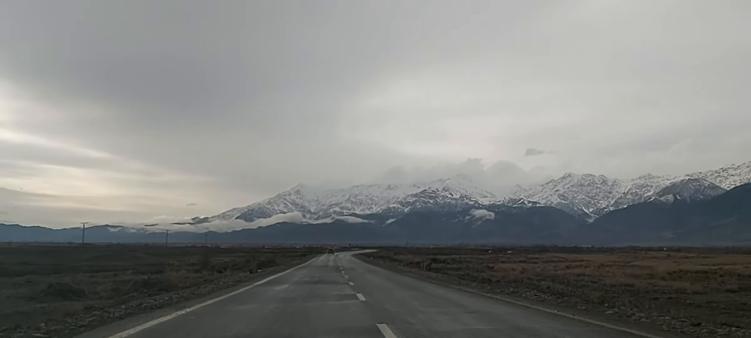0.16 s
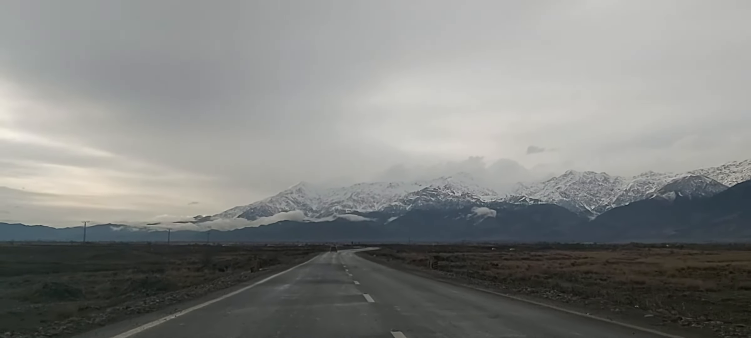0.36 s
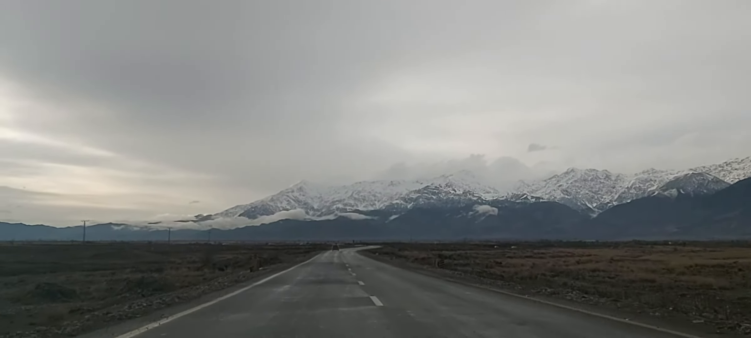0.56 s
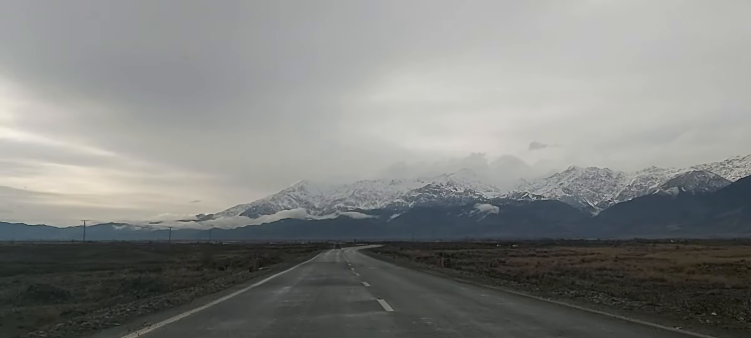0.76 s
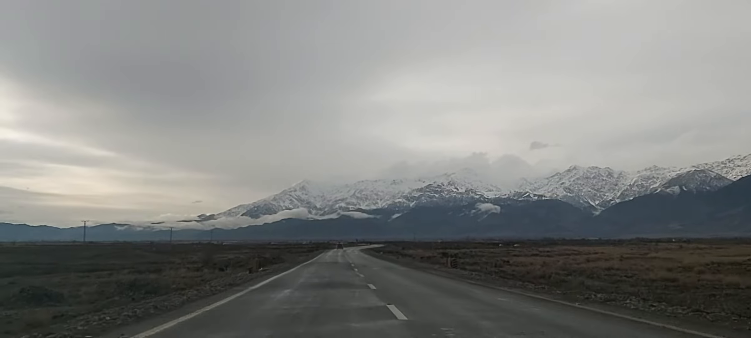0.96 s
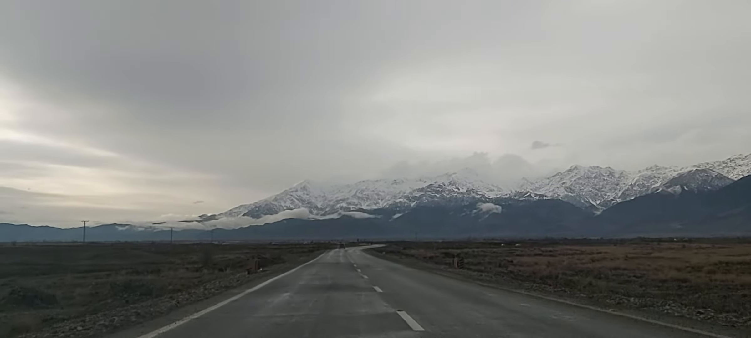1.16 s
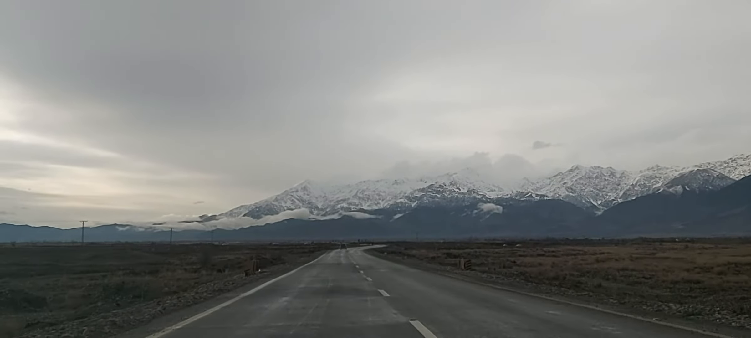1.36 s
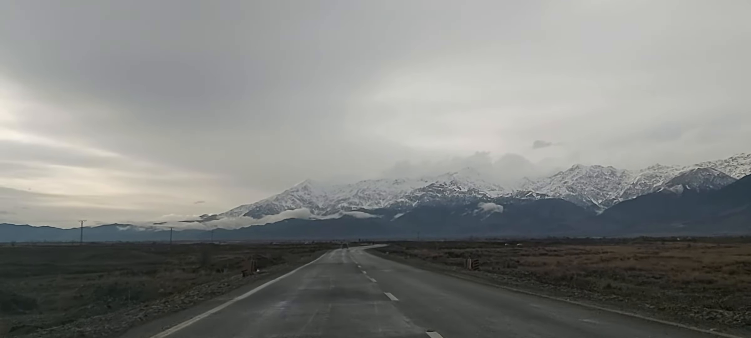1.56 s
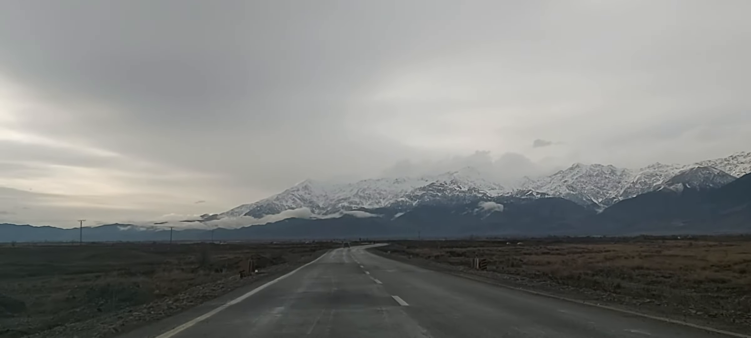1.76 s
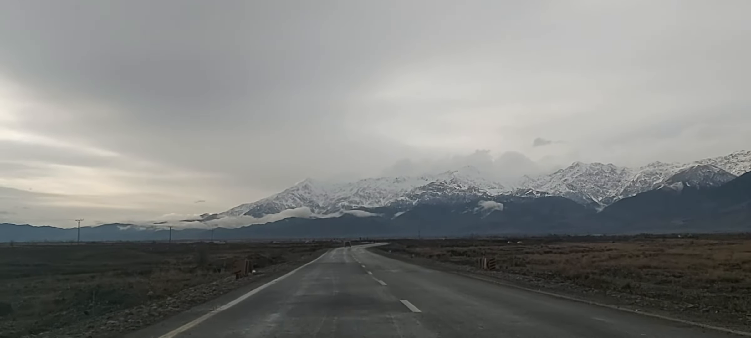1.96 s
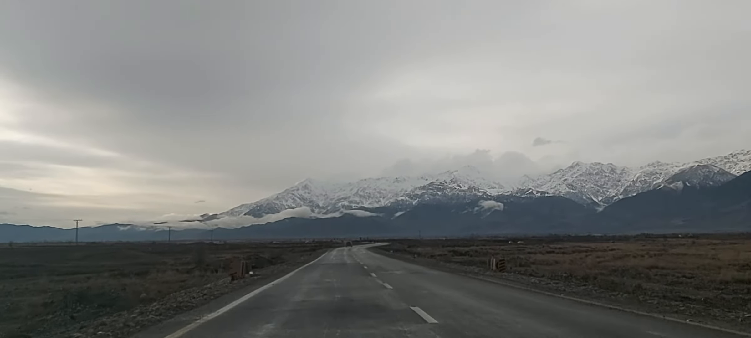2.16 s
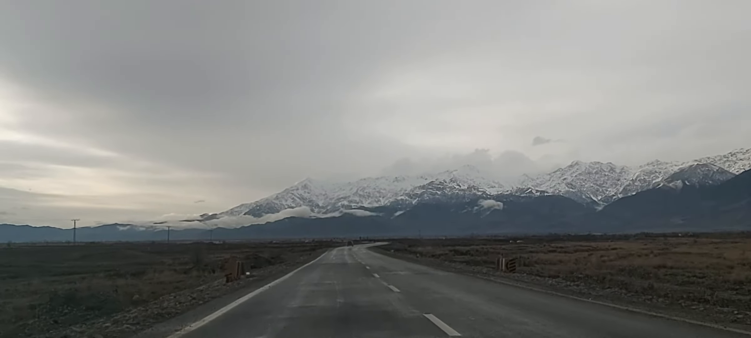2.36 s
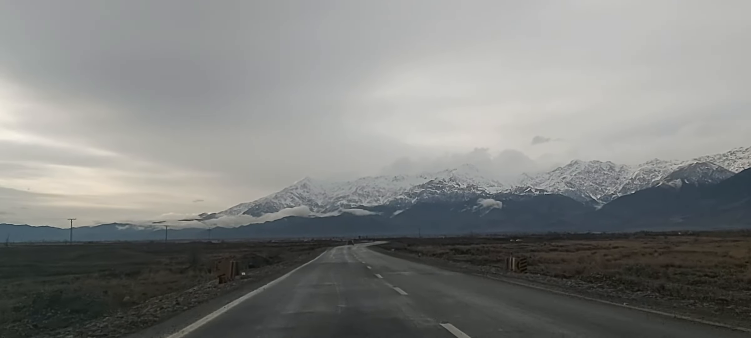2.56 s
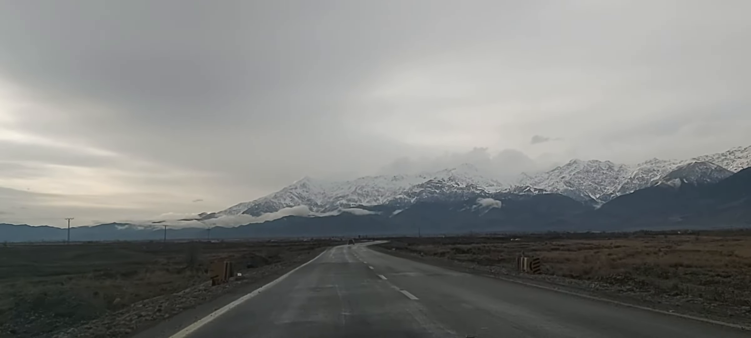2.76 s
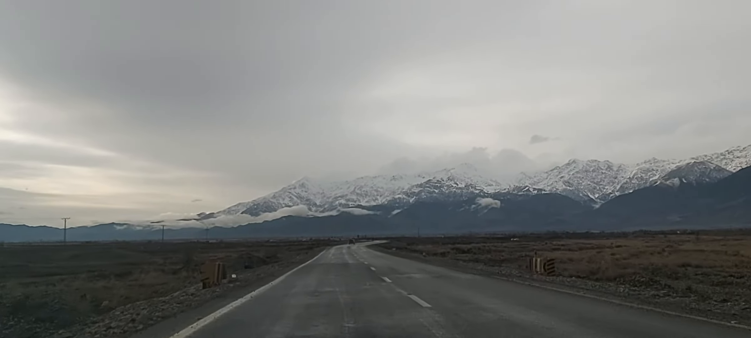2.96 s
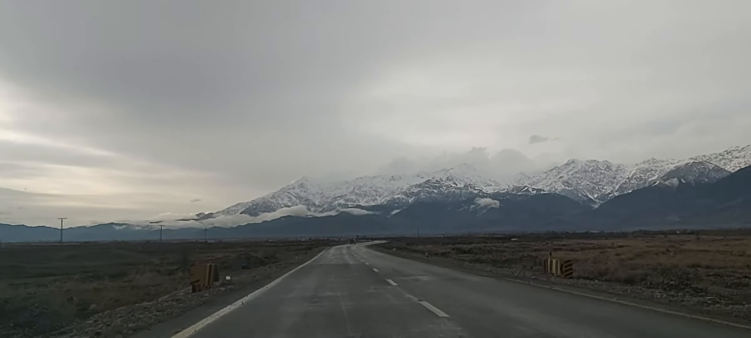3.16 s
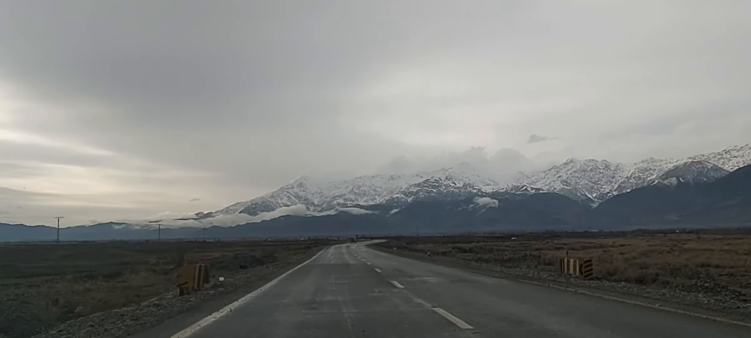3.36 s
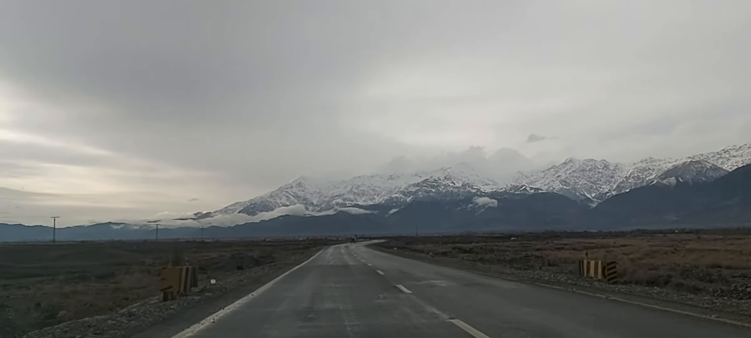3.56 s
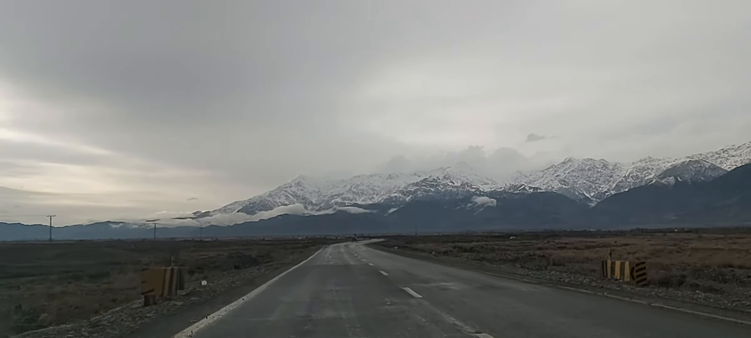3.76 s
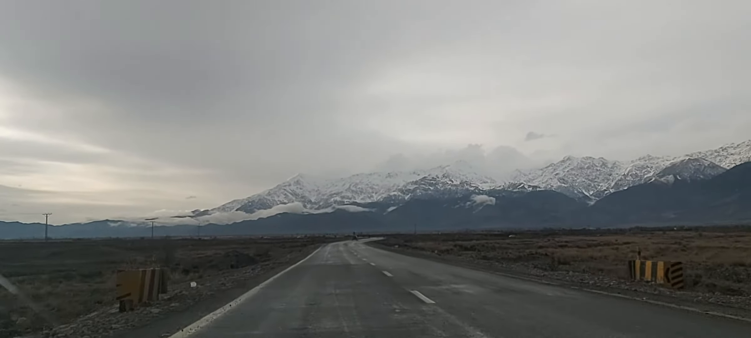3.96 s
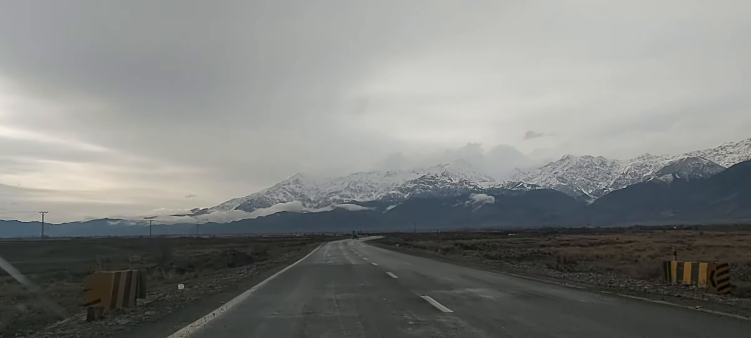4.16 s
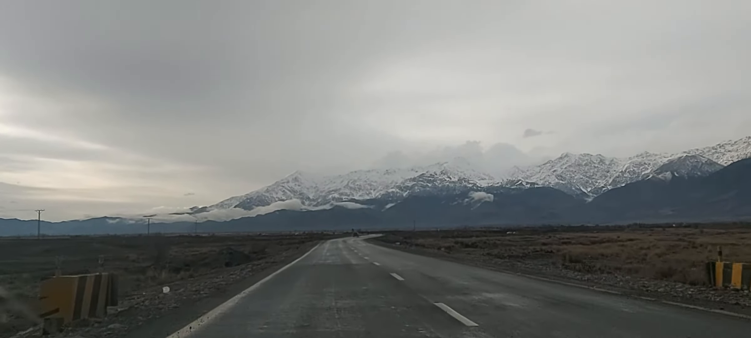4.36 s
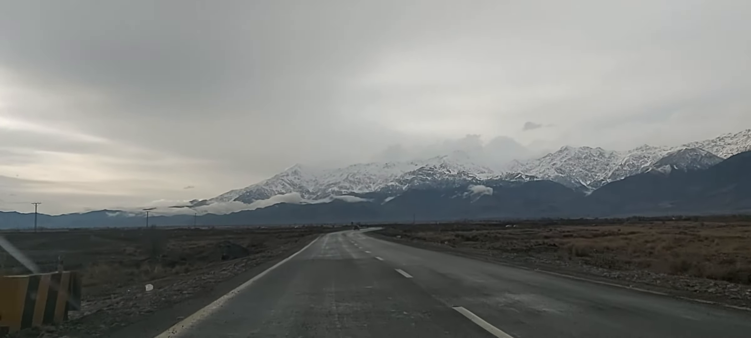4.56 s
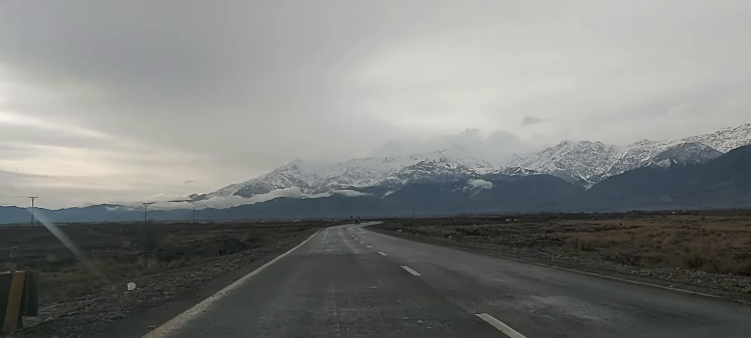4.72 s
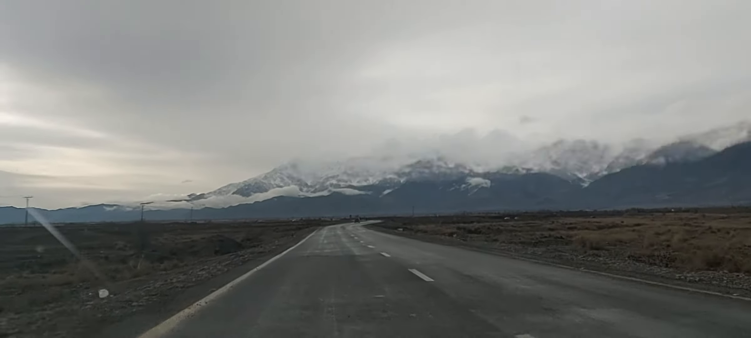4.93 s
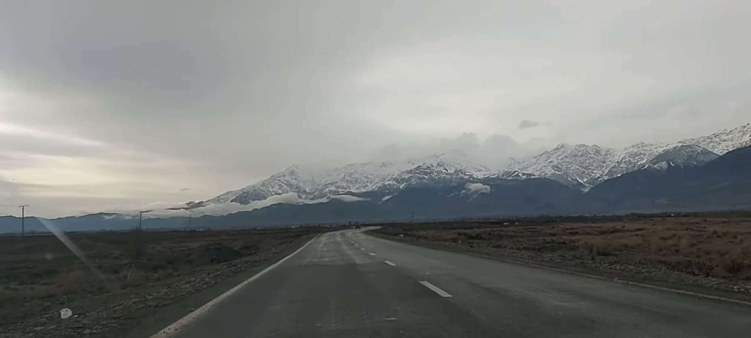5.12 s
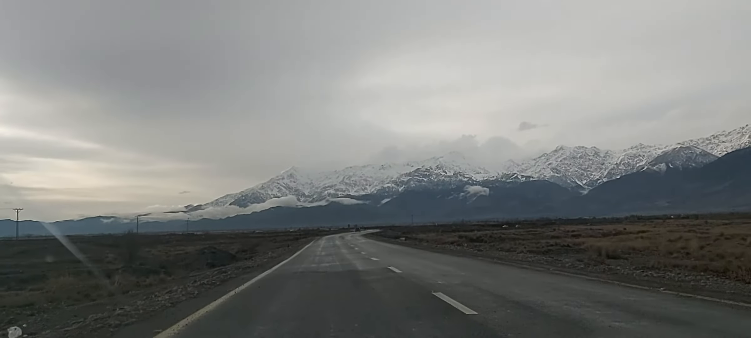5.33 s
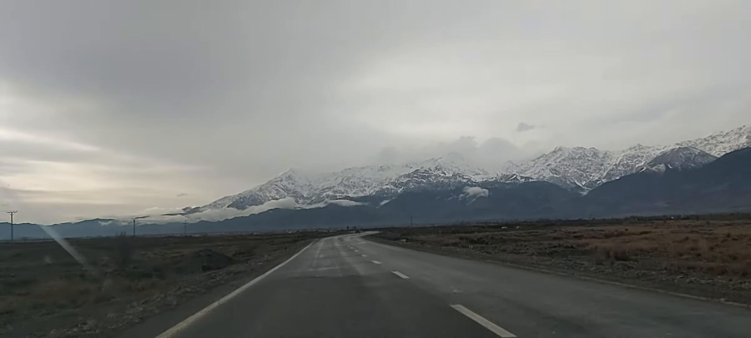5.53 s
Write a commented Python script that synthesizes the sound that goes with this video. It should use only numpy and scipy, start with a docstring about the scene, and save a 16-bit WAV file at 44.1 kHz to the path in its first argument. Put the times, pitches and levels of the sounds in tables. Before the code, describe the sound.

Car cabin on a country road: deep rumble and engine hum, tick-tock turn signal, dull bump thuds, and sharp plastic rattles near the end.

```python
"""A car engine drones low in the cabin on a country road: multiples of its firing rate, added as sines.
The indicator relay goes tick-tock: noise bursts over the damped modes of its housing.
Bumps in the road set the microphone's mount booming: damped sines. Loose plastic trim snaps early on and
near the end, where it also rattles: filtered impulses and modulated noise.
Behind lie tyre rumble, roar and hiss, all shaped noise, and the droning resonance of the cabin, a sine."""
import sys
import numpy as np
from scipy import signal
from scipy.fft import rfft, irfft, next_fast_len
from scipy.io import wavfile
from scipy.ndimage import uniform_filter1d, minimum_filter1d

SR = 44100
rng = np.random.default_rng(int(sys.argv[2]) if len(sys.argv) > 2 else 0)


def pcm_store(signal):
    """Save signal as 16-bit PCM."""
    levels = np.round(np.clip(np.atleast_2d(signal), -1, 1) * 32767)
    wavfile.write(sys.argv[1], SR, levels.astype(np.int16).T)


N = 250929
T = np.arange(N) / SR


def undb(db):
    """Level to amplitude: 20 dB is a factor of ten."""
    return 10 ** (np.asarray(db) / 20)


def unit(x):
    """Normalisation to a root-mean-square amplitude of 1."""
    return x / np.sqrt(np.mean(x ** 2))


def curves(table):
    """Linear interpolation in time of each column that follows t/s."""
    s, *columns = np.transpose(table)
    return [np.interp(T, s, c) for c in columns]


def pan(db):
    """Interaural level difference: left and right gains that differ by db, left minus right."""
    return undb(np.array([[db], [-db]]) / 2)


def along(points, size):
    """Interpolation over log frequency of an (f/Hz, value) table, on the bins of a transform."""
    hz, value = np.transpose(points)
    bins_hz = np.fft.rfftfreq(size, 1 / SR)
    return np.interp(np.log(bins_hz + 1), np.log(hz), value)


def colour(x, points):
    """Minimum-phase filtering: folding the cepstrum makes an (f/Hz, level/dB) response causal."""
    size = next_fast_len(x.shape[-1] // 2 + SR // 20) * 2
    cepstrum = irfft(np.log(undb(along(points, size))))
    cepstrum[1:size // 2] *= 2
    cepstrum[size // 2 + 1:] = 0
    response = np.exp(rfft(cepstrum))
    return irfft(rfft(x, size) * response)[..., :x.shape[-1]]


def walk(rate):
    """Smoothed random modulation: `rate` random steps a second, averaged twice, rms 1."""
    k = int(SR / rate)
    steps = np.repeat(rng.standard_normal(N // k + 1), k)
    return unit(uniform_filter1d(uniform_filter1d(steps, k), k)[:N])


def fade(t, t60):
    """Exponential decay: the level falls by 60 dB in t60 seconds."""
    return np.exp(-np.log(1000) * t / t60)


def add(out, s, sound):
    """Superposition: a stereo sound is summed in from time s."""
    i = max(int(s * SR), 0)
    out[:, i:i + sound.shape[1]] += sound[:, :max(N - i, 0)]


# engine speed, creeping up, then sinking as the throttle eases:
# (t/s, mean firing rate f/Hz, growl level in the 3rd multiple/dB)
ENGINE_SPEED = [(0, 63.32, -38), (.6, 64.07, -41), (1.3, 65.8, -37), (2.45, 66.8, -33), (2.8, 60.78, -35),
                (4.2, 60.14, -33), (5.69, 61.5, -42.5)]
# firing tone and its 2nd multiple: (level at the reference rate/dB, level gained per Hz of firing rate/dB)
ENGINE_TONES = [(-32, -1.25), (-30.5, -.25)]
ENGINE_REF_HZ = 64


def engine(waver=.0035, flutter_db=2.13):
    """Harmonic series: multiples of a wavering firing rate; the lowest swells nearing the cabin's resonance."""
    hz, growl_db = curves(ENGINE_SPEED)
    levels = [db + slope * (hz - ENGINE_REF_HZ) for db, slope in ENGINE_TONES]
    levels.append(growl_db)
    phase = 2 * np.pi * np.cumsum(hz * (1 + waver * walk(7.9))) / SR
    tones = np.zeros(N)
    for k, db in enumerate(levels, 1):
        tone = unit(np.sin(k * phase + rng.uniform(0, 2 * np.pi)))
        tones += tone * undb(db + flutter_db * walk(12))
    return tones * pan(-5.0)


# modes of the relay housing:
# (f/Hz, 60 dB decay time t/s, relative level pulling in/dB, relative level letting go/dB)
HOUSING_MODES = [(1070, 0.061, -7.5, -18.5), (1644, 0.035, 5, -5.5), (1986, 0.023, -14, -3),
                 (2374, 0.11, -8, -1.5), (2568, 0.035, 5, -0.5), (2770, 0.075, -16, 0.5),
                 (3370, .05, -3, -16), (6080, .04, -18.5, -29), (6600, 0.08, -20, -11.5)]
FIRST_LOUDER_DB = 1.5  # the first flash strikes harder


def relay(strokes, ring_db, points, level_db, modes_db, pan_db, ring_pan_db, t60):
    """Impact excitation: the armature chatters on its stop, the housing's modes ring, the cabin answers."""
    out, t = np.zeros((2, N)), np.arange(SR // 4) / SR
    rise = np.minimum(t / 0.0025, 1)
    cabin = undb(-21) * fade(t, .35)
    for k, s in enumerate(strokes):
        stroke_db = level_db + (FIRST_LOUDER_DB if k == 0 else 0)
        noise = rng.standard_normal((2, len(t)))
        chatter = unit(colour(noise, points)) * np.hypot(fade(t, t60), cabin)
        ring = np.zeros((2, len(t)))
        for (hz, mode_t60, _, _), db in zip(HOUSING_MODES, ring_db):
            ring += undb(db) * fade(t, mode_t60) * np.sin(2 * np.pi * (hz * t + rng.random((2, 1))))
        stroke = chatter * pan(pan_db) + undb(modes_db) * ring * pan(ring_pan_db)
        add(out, s, undb(stroke_db) * rise * stroke)
    return out


# spectrum of the chatter as the relay pulls in: (f/Hz, relative level/dB)
TICK_COLOUR = [(700, -17), (1500, -3.5), (2500, -4), (3300, -2.5), (4800, -18), (6100, -13.5), (7200, -13),
               (8600, -26.5), (12000, -22.5), (15500, -34), (16300, -51.5)]
# spectrum of the chatter as it lets go: (f/Hz, relative level/dB)
TOCK_COLOUR = [(700, -30), (1500, -3.5), (2500, 1), (3600, -6), (4500, -18), (6700, -12), (8300, -22.5),
               (9600, -11.5), (11000, -17), (12500, -13), (15600, -20.5), (16300, -43.5)]
# the flasher's clock: first tick, period, time the lamp stays lit, how much sooner the second tick comes
FIRST_TICK_S, FLASH_S, LIT_S, FIRST_SHORT_S = .263, .685, .3428, .0232


def indicator():
    """Periodic switching: each flash has a full tick as the relay pulls in, a thinner tock as it lets go."""
    _, _, pull_db, release_db = np.transpose(HOUSING_MODES)
    pulls = np.arange(FIRST_TICK_S, N / SR, FLASH_S)
    pulls[1:] -= FIRST_SHORT_S
    tick = relay(pulls, pull_db, TICK_COLOUR, level_db=-40.5, modes_db=0,
                 pan_db=-10.0, ring_pan_db=-17.0, t60=0.08)
    tock = relay(pulls + LIT_S, release_db, TOCK_COLOUR, level_db=-41, modes_db=-4.5,
                 pan_db=-9.5, ring_pan_db=-9, t60=0.076)
    return tick + tock


# jolts from the road: (t/s, relative level/dB)
BUMPS = [(.425, -11), (0.827, -0.5), (.879, -4.5), (.908, -9.5), (2.878, -5), (4.162, -5), (4.959, -11.5),
         (5.324, -5.5), (5.367, -11.5), (5.396, -2), (5.544, -0.5), (5.628, -8.5)]
BUMP_PUSH_S = .013  # time for the mount to swing up


def bumps(ring_hz=138, t60=0.11, thud_db=-10.0, thud_hz=95):
    """Damped oscillation: each jolt swings the mount up, then it rings out over a lower thud of the body."""
    out, t = np.zeros((2, N)), np.arange(SR // 4) / SR
    push = np.sin(np.pi / 2 * np.minimum(t / BUMP_PUSH_S, 1)) ** 2
    swing = push * fade(np.maximum(t - BUMP_PUSH_S, 0), t60)
    ring = np.sin(2 * np.pi * ring_hz * t)
    for s, db in BUMPS:
        thud = undb(thud_db) * np.sin(2 * np.pi * (thud_hz * t + rng.random()))
        add(out, s, undb(db) * swing * (ring + thud) * pan(-3.0))
    return out


# trim snaps: (t/s, relative level/dB, left minus right level/dB, dull above f/Hz)
SNAPS = [(0.483, -28, -15, 3500), (0.681, -31.5, 15, 5000), (.810, -14, -19, 1600), (4.8127, 0.5, 19, 4700),
         (4.915, -6.5, -27, 17000), (4.918, -2, -9, 5500), (4.9755, -21.5, 8, 7000),
         (5.1132, -6, -13, 3600), (5.168, -21, 0, 5000), (5.2064, 0.5, -13, 1470),
         (5.539, -13.5, -21, 2800), (5.596, -22.5, -11.5, 3000)]
# spectrum of a snap before dulling: (f/Hz, relative level/dB)
TRIM_COLOUR = [(200, -13), (600, 0.5), (1250, 2.5), (2300, 1), (3300, -4), (4250, 2), (5800, -7),
               (8000, -1.5), (13000, 4.5), (16000, 1.5)]
SNAP_CYCLES = 42  # 60 dB decay in cycles of the dulling frequency: soft contacts last longer


def trim(level_db=-3, scatter_db=-19, tail_db=-54):
    """Impulse response: loose plastic snaps once, scatters off nearby panels and dies in the upholstery."""
    out, t = np.zeros((2, N)), np.arange(SR // 6) / SR
    for s, db, pan_db, dull_hz in SNAPS:
        scatter = undb(scatter_db) * fade(t, SNAP_CYCLES / dull_hz)
        tail = undb(tail_db) * fade(t, 0.14)
        snap = rng.standard_normal((2, len(t))) * (scatter + tail)
        snap[:, 0] += 1  # the direct impulse
        contact = signal.butter(2, min(dull_hz, .45 * SR), fs=SR, output="sos")
        dulled = signal.sosfilt(contact, colour(snap, TRIM_COLOUR))
        add(out, s, dulled * undb(db + level_db) * pan(pan_db))
    return out


# trim rubbing between snaps: (start t/s, length t/s, peak level of the swell/dB)
RUBS = [(4.82, 0.12, -62), (4.94, 0.16, -64), (5.12, 0.13, -63), (5.488, 0.17, -66)]
# spectrum of the rubbing: (f/Hz, relative level/dB)
RUB_COLOUR = [(2000, -16), (4000, -2), (5800, -3), (7300, -4.5), (8800, -11), (13000, -11), (16000, -17)]


def rubbing():
    """Stick-slip friction: plastic on plastic as noise with a fast grain, for a dense run of tiny slips."""
    out = np.zeros((2, N))
    grain = undb(2.5 * walk(900))
    slips = unit(colour(rng.standard_normal((2, N)) * grain, RUB_COLOUR))
    for s, length, db in RUBS:
        u = np.clip((T - s) / length, 0, 1)
        swell = 2 * np.sqrt(u * (1 - u))
        out += slips * swell * undb(db) * pan(5.5)
    return out


# likeness of the two sides: (f/Hz, left-right correlation)
LIKENESS = [(30, 0.9), (130, 0.92), (290, 0.92), (640, 0.27), (1400, -0.38), (3000, 0.13), (16000, .05)]


def cabin_noise():
    """Diffuse-field coherence: long waves reach both sides alike, short ones do not."""
    size = next_fast_len(N // 2 + 1) * 2
    c = np.clip(along(LIKENESS, size), -1, 1)
    mid, side = rfft(rng.standard_normal((2, size))) * np.sqrt([1 + c, 1 - c])
    return irfft(np.array([mid + side, mid - side]))[:, :N]


# coarseness of the asphalt, with a smooth stretch early on: (t/s, rumble level before the reference/dB)
ROAD_RUMBLE = [(0, -24), (.5, -22), (1.1, -27.5), (1.7, -29.5), (2.65, -24), (4.4, -22), (5.69, -23)]
RUMBLE_REF_DB = -24


def coarseness():
    """Roughness excitation: the road's rumble level in dB against the reference."""
    return curves(ROAD_RUMBLE)[0] - RUMBLE_REF_DB


# spectrum of the deep rumble: (f/Hz, relative level/dB per Hz)
RUMBLE_COLOUR = [(18, -28), (30, -11), (46, 0), (58, 0), (72, -3), (90, -2), (110, 1), (130, -2), (155, -6),
                 (168, -11), (185, -6), (200, -8), (218, -17), (270, -40), (1500, -100)]


def rumble(coarse_db):
    """Structure-borne noise: coarse asphalt shakes the body and the cabin air."""
    return unit(colour(cabin_noise(), RUMBLE_COLOUR)) * undb(-25 + coarse_db) * pan(-3.5)


def drone(coarse_db):
    """Cavity resonance: the wheels keep the cabin's lowest mode droning, its pitch drifting."""
    hz = 51 + 1.8 * walk(6)
    tone = unit(np.sin(2 * np.pi * np.cumsum(hz) / SR))
    return tone * undb(-29.5 + coarse_db) * undb(2.5 * walk(7)) * pan(-1.8)


# spectrum of the body panels: (f/Hz, relative level/dB per Hz)
PANEL_COLOUR = [(170, -30), (225, -9.5), (255, -5), (275, -6), (298, 1), (320, -8), (345, -16), (420, -29),
                (600, -68.5), (2500, -100)]


def panels(roar_db):
    """Forced panel vibration: a boom in step with the tread, .6 dB for each dB of tyre roar."""
    level_db = -30.5 + .6 * (roar_db - roar_db.mean())
    return unit(colour(cabin_noise(), PANEL_COLOUR)) * undb(level_db) * pan(-4.5)


# spectrum of the tyre roar: (f/Hz, relative level/dB per Hz)
TYRE_COLOUR = [(250, -21.5), (360, 0.5), (450, 1), (540, -5), (605, -0.5), (700, -9), (820, -16.5),
               (1100, -19.5), (2000, -68.5), (4000, -91)]


def tyre_roar(roar_db):
    """Tread noise: a band of diffuse noise whose level follows the road and flickers a little."""
    return unit(colour(cabin_noise(), TYRE_COLOUR)) * undb(roar_db + 1.0 * walk(14)) * pan(-3.0)


# spectrum of the hiss on the left: (f/Hz, relative level/dB per Hz)
HISS_LEFT = [(500, -17), (1050, 0), (1400, -3), (2000, -7.5), (2700, -12.5), (3300, -23.5), (4100, -19),
             (5000, -33), (7400, -33.5), (8400, -43.5), (13000, -39), (16000, -40.5)]
# spectrum of the hiss on the right: (f/Hz, relative level/dB per Hz)
HISS_RIGHT = [(500, -9.5), (1050, 2.5), (1400, -3), (2200, -4), (3000, -11), (3900, -16), (4800, -25.5),
              (5800, -30), (7400, -32), (8400, -37), (13000, -36), (16000, -37)]


def tyre_hiss(hiss_db):
    """Broadband tread noise: the hiss has its own spectrum on each side."""
    left, right = cabin_noise()
    hiss = np.array([unit(colour(left, HISS_LEFT)), unit(colour(right, HISS_RIGHT))])
    return hiss * undb(hiss_db + 0.49 * walk(16)) * pan(-7)


# tread noise: (t/s, mean level of the tyre roar/dB, mean level of the hiss/dB)
TREAD = [(0, -40.5, -52), (1.1, -44, -54), (1.7, -44, -53.5), (2.65, -40, -51), (3.3, -40.5, -52.5),
         (4.4, -42.5, -53), (5, -41.7, -51), (5.69, -45.5, -53)]


def road():
    """Common excitation: one coarseness drives rumble and drone, one tread the panels and roar; hiss on top."""
    coarse_db = coarseness()
    roar_db, hiss_db = curves(TREAD)
    low = rumble(coarse_db) + drone(coarse_db)
    return low + panels(roar_db) + tyre_roar(roar_db) + tyre_hiss(hiss_db)


def scene():
    """Superposition of everything heard in the cabin."""
    return engine() + indicator() + bumps() + trim() + rubbing() + road()


def record(dry):
    """Peak limiting and low-pass filtering: a smoothed gain eases loud peaks down; the top is cut."""
    ceiling = .83
    gain = ceiling / np.maximum(np.abs(dry).max(axis=0), ceiling)
    held = minimum_filter1d(gain, size=900)
    gain = uniform_filter1d(uniform_filter1d(held, size=440), size=440)
    top_cut = signal.ellip(8, .2, 70, 16400, fs=SR, output="sos")  # ripple dB, stopband dB, edge Hz
    return signal.sosfilt(top_cut, dry * gain)


dry = scene()
out = record(dry)
pcm_store(out)
```